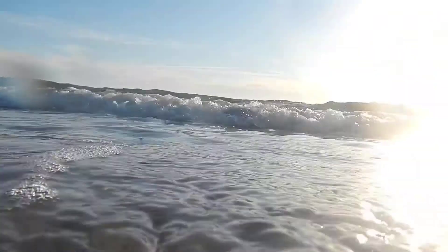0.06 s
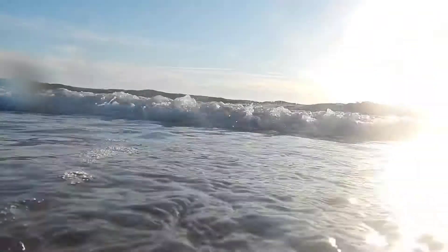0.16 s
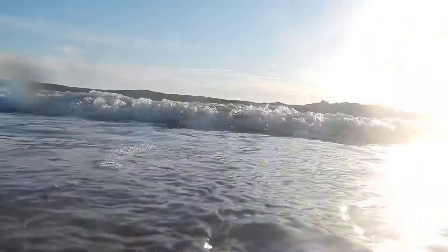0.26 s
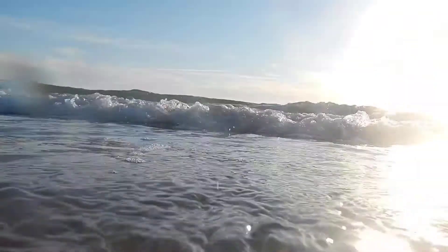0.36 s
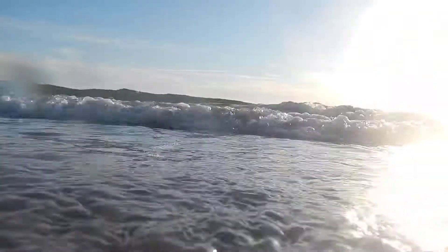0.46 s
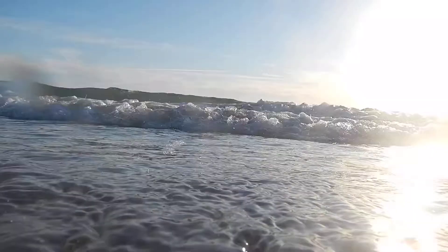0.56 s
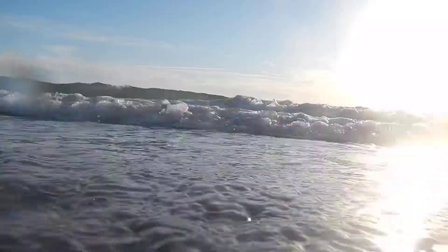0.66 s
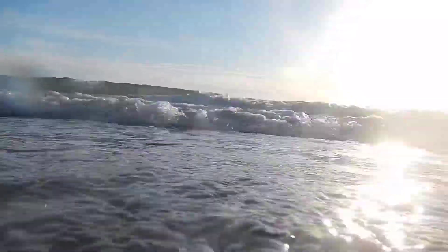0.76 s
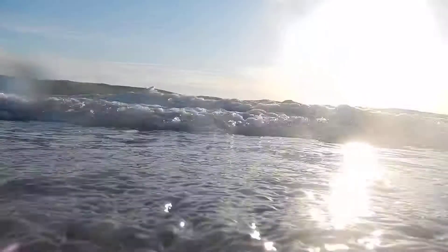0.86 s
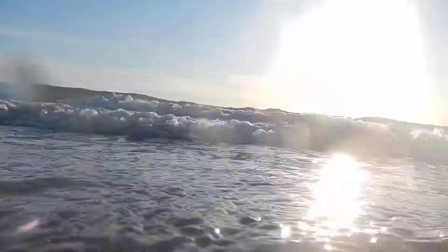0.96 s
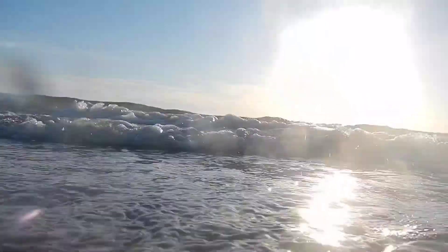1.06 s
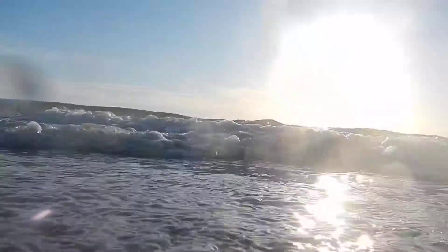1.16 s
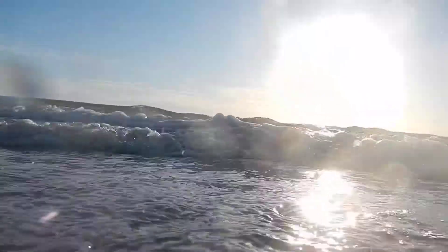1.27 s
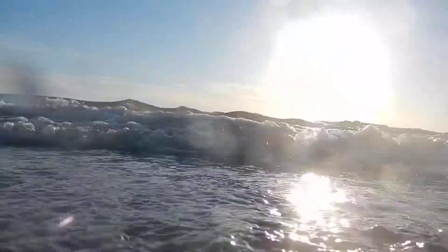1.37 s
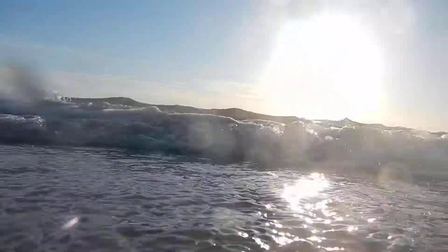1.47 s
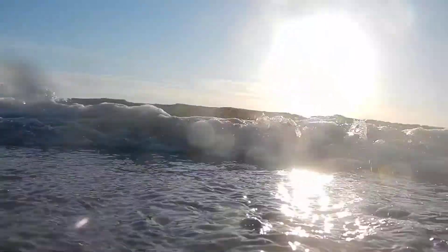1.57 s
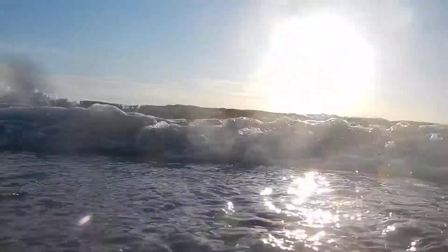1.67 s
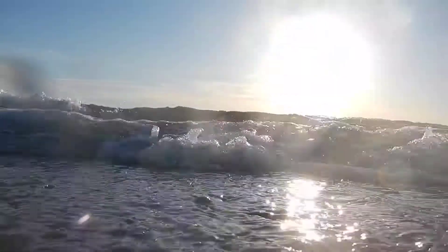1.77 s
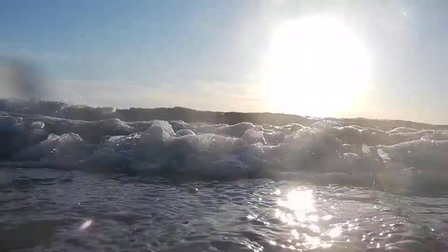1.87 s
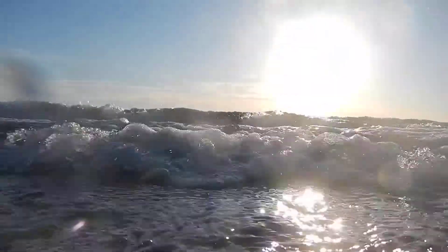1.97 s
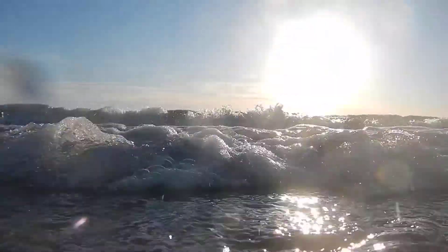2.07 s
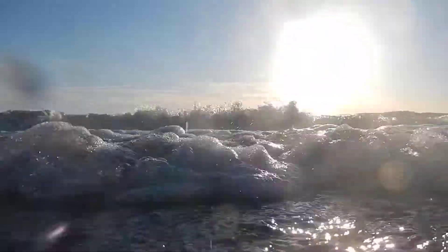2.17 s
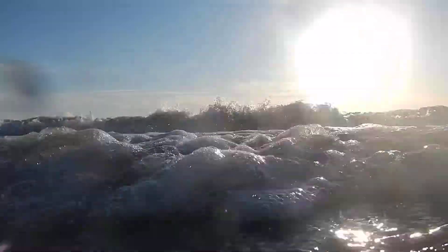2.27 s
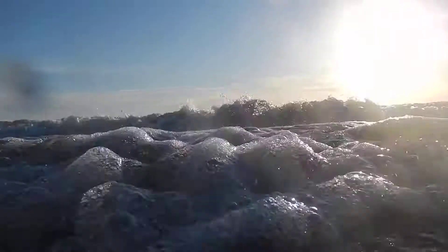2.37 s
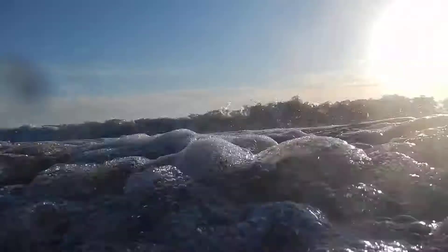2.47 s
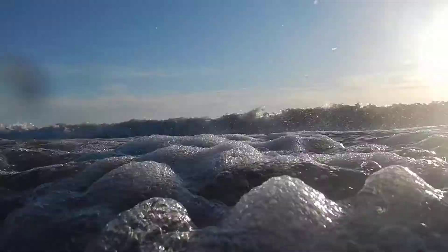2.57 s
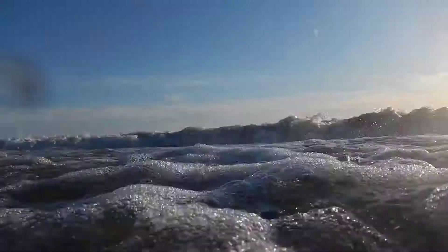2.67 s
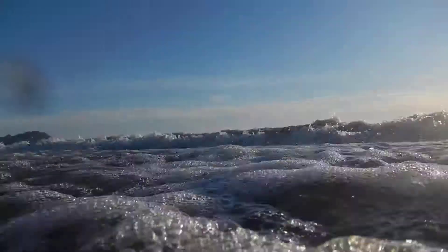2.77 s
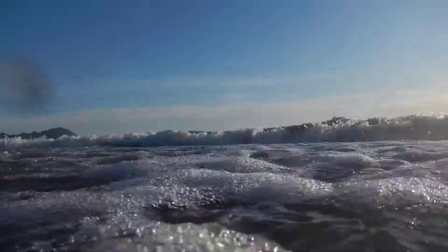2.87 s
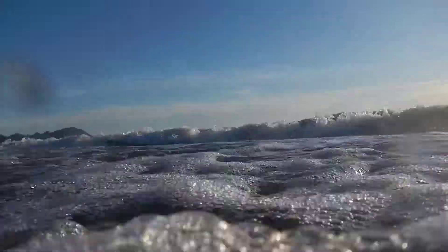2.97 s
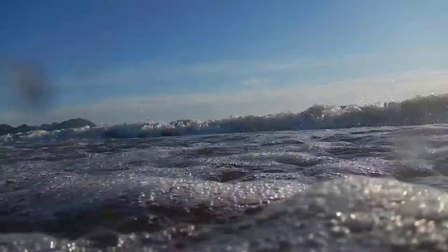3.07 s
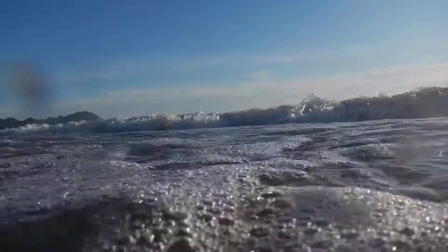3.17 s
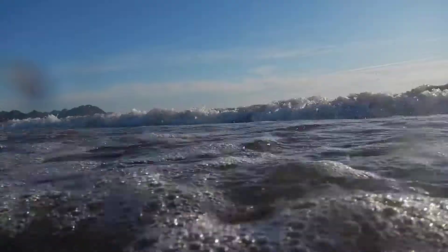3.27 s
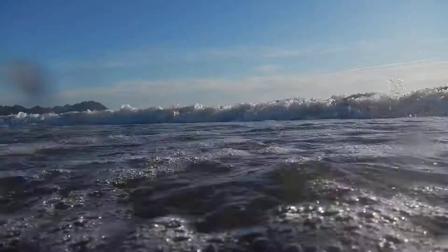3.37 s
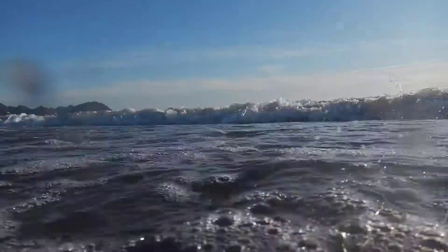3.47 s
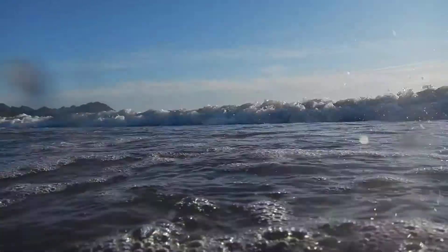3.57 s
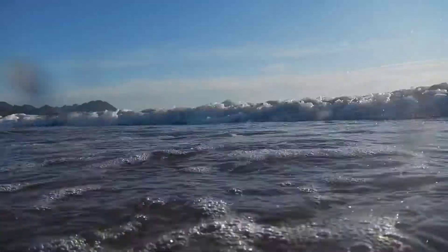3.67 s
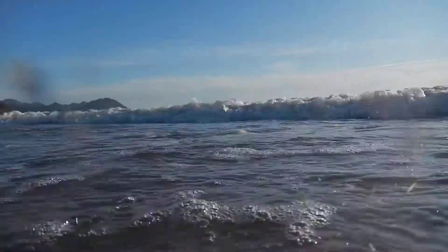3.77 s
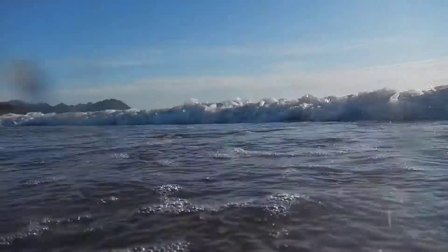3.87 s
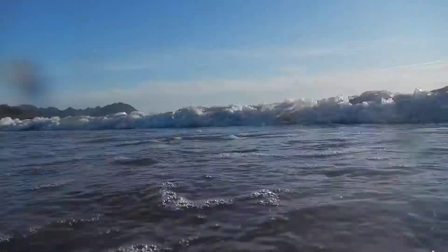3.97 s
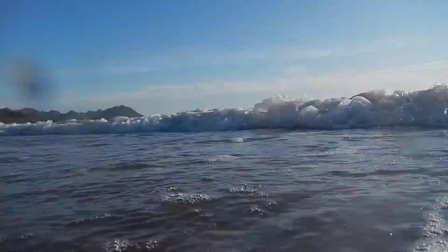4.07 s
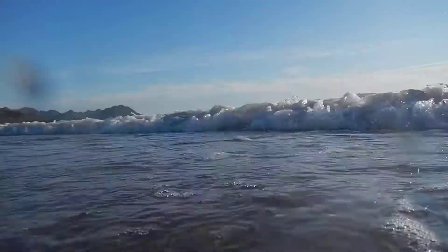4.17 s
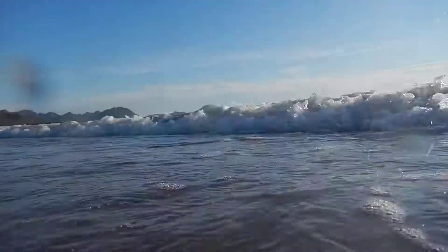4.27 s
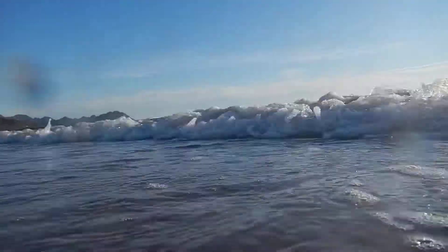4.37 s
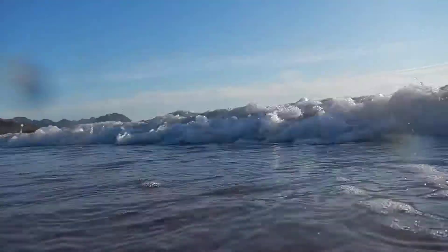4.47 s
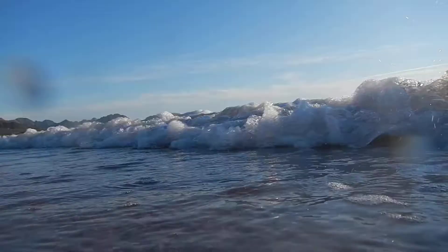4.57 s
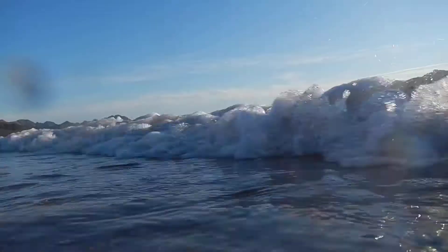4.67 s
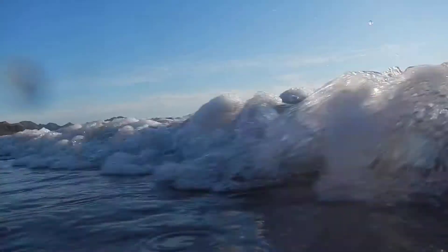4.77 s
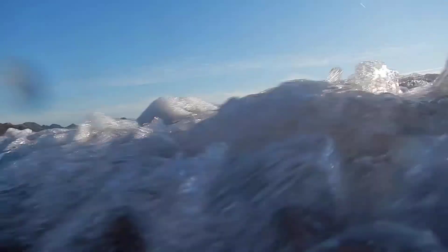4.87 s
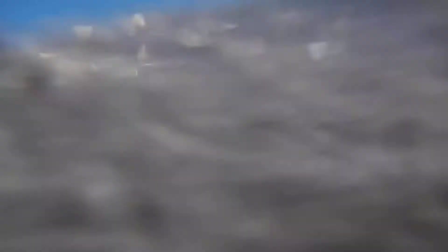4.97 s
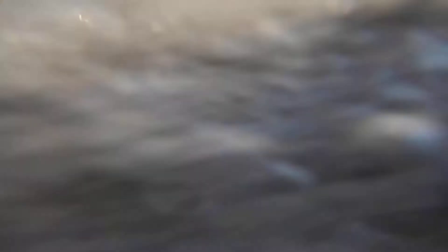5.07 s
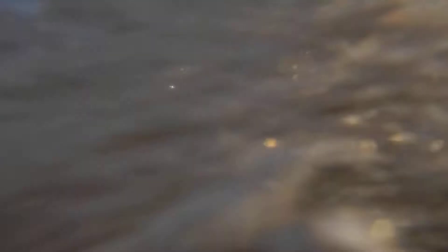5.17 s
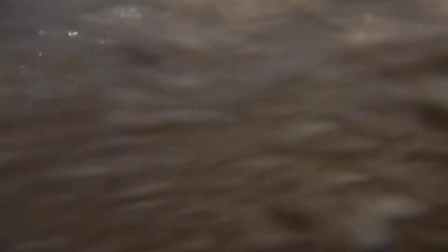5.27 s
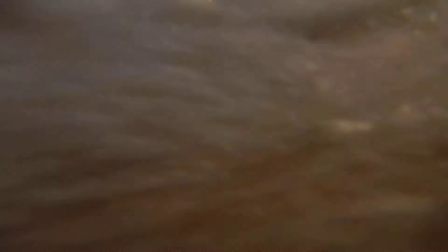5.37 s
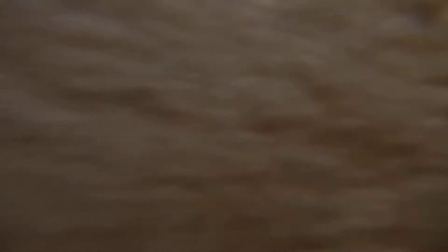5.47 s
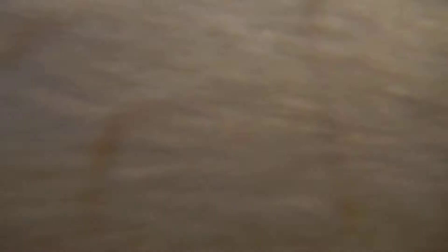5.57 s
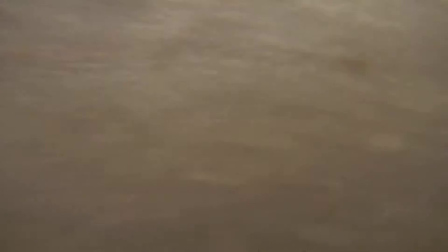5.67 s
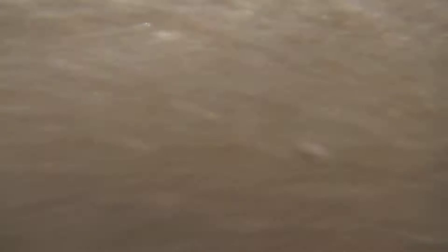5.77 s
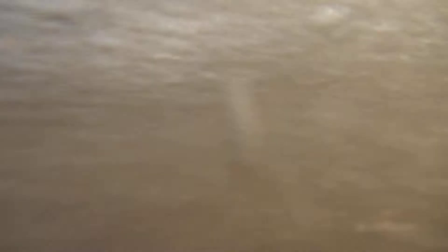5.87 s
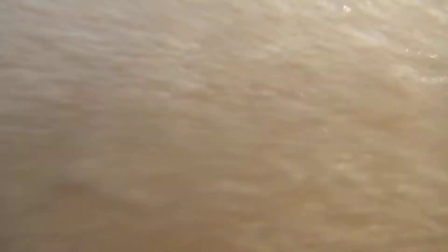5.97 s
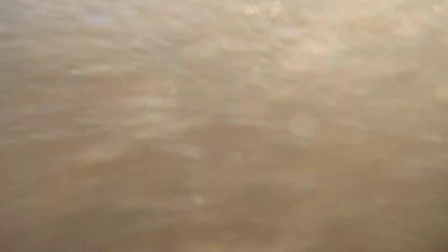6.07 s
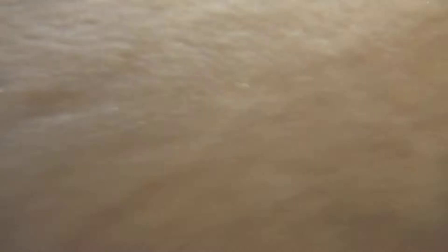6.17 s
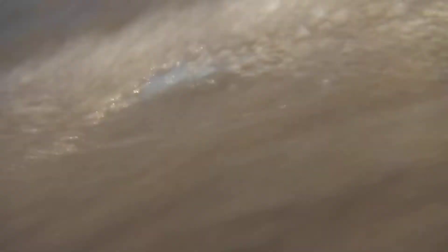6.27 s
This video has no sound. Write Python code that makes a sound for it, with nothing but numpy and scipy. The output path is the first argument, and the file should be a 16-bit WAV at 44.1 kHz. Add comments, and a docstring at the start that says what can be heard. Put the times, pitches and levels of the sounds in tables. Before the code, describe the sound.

Very close, resonant shallow surf builds, cuts back after sharp wet slaps and builds again, with bright foam hiss and clicking drops. A cluster of thuds and splashes near the middle leaves a softer wash. Just before five seconds a wave buries the microphone: loud slaps, rumbling bubbles, then duller underwater gurgling with ringing glugs to the end.

```python
"""Shallow surf roars and hisses through the two wet microphone ports of a waterproof camera at the waterline:
shaped noise, port resonances and bursting foam. Its level creeps up and drops, often just after a hard slap.
Drops ping as short gliding tones, slaps are noise bursts, wet films squeak and a very faint whine follows the roar.
A wave then buries the camera: random bubble tones and pops churn, a pocket of air hums and others glug."""
import sys
import numpy as np
from scipy import signal
from scipy.fft import rfft, irfft, next_fast_len
from scipy.io import wavfile
from scipy.ndimage import uniform_filter1d

SR = 44100
rng = np.random.default_rng(int(sys.argv[2]) if len(sys.argv) > 2 else 0)


def to_wav(s):
    """Save 16-bit WAV."""
    ch = np.atleast_2d(s).T  # columns
    pcm = np.round(np.clip(ch, -1, 1) * 32767)  # PCM
    wavfile.write(sys.argv[1], SR, pcm.astype(np.int16))


N = 279153  # samples

# level of the surf, which steps to a new level at each spell and then creeps up, before layer trims; the last
# three are relative to the roar: # start_s, roar_db, climb_db_per_s, ring_db, hiss_db, sizzle_db
SURF_SPELLS = [(0, -49, 20.5, 3.5, -17.5, -15), (1.05, -33, 17, 3, -23, -23.5),
               (1.646, -35, 24, 1, -23.5, -17), (1.998, -46.5, 17, -5.5, -22.5, -13.5),
               (2.859, -57.5, 8, -7.5, -25, -7), (3.111, -53, 16, -6, -18, -3),
               (3.916, -58, 16.5, 1, -14.5, -1.5)]
# breakers that swell as they come close: peak_s, half_length_s (to 1/e of the swell), swell_db
BREAKERS = [(1.488, 0.098, 1), (4.878, 0.15, 5.5)]
# relative spectra of the roar and of the foam hiss: frequency_hz, level_db
ROAR_SPECTRUM = [(25, -12), (100, -2.5), (180, -4.5), (270, -12.5), (390, 2), (520, 0), (700, -0.5),
                 (1200, -1.5), (1800, -15), (2300, -43), (4000, -50.5), (8000, -66)]
HISS_SPECTRUM = [(300, -30.5), (1500, 10), (2000, -0.5), (2500, 18), (3700, 16.5), (4700, -5.5),
                 (5800, 1.5), (6900, -33), (10000, -49), (16000, -56)]
# resonances of each wet port: pitch_hz, width_hz (of one filter pass), relative_level_db
LEFT_RESONANCES = [(1030, 120, -1), (1447, 270, 7), (3340, 1230, -25)]
RIGHT_RESONANCES = [(785, 210, 9.2), (962.6, 153, 16.4), (1496, 237, 0.67)]
# phase by which the right port leads the left: frequency_hz, lead_rad
PORT_PHASE = [(150, -1.5), (450, 0.56), (780, 0.35), (950, -1.33), (1250, -2.05), (1500, 0.5), (1900, 1.23),
              (2400, 4), (3000, 3.5), (3900, 1.5), (5000, 1.43), (7500, 1.5)]
# a foam front sizzling up close: time_s, centre_hz, level_db
FOAM_FRONT = [(2.0, 1550, -48), (2.1, 1694, -40), (2.25, 1830, -36), (2.42, 1704, -39), (2.6, 1650, -40.5),
              (2.72, 1503, -26.5)]
# larger drops landing on the case and ports: start_s, peak_db, pitch_hz, left_minus_right_db
DROPS = [(0.1459, -20.5, 1544, 4), (0.254, -26.5, 1440, -15), (0.659, -29.5, 2640, -13.5),
         (0.78, -30, 2700, -4), (0.803, -26, 2130, -12), (0.909, -21, 5070, 0), (0.991, -11, 1460, 5),
         (1.0434, -1.5, 1730, -11.5), (1.0808, -31, 4700, -8), (1.205, -28.5, 7850, 1),
         (1.2132, -4.5, 1400, -4), (1.223, -12.5, 4850, 1), (1.2739, -2.5, 1610, -2),
         (1.6276, -6, 1504, -7), (1.729, -27, 2520, -8), (1.792, -42, 6800, -2), (2.410, -16.5, 1545, 8),
         (2.712, -31.5, 3900, 8), (2.721, -8.5, 1315, -5), (2.7855, -8, 2670, 1), (4.913, -4, 1270, -11),
         (5.157, -25, 3420, 0), (5.267, -20.5, 2760, 2), (5.279, -8.5, 1420, -1), (6.03, -34, 4405, -2),
         (6.045, -32.5, 3520, 11), (6.1468, -28, 3300, -5), (6.1524, -23, 3010, 4.5)]
# hard slaps of water on the case, thud before its trim: start_s, thud_db, snap_db, left_minus_right_db
SLAPS = [(1.042, -26, -24, 0), (1.483, -39, -18, 1), (1.582, -23, -31.5, -14), (1.625, -16, -23, -6),
         (1.9865, -11.5, -14.5, 4), (2.545, -19, -41, -1), (2.693, -33, -29, 2), (2.7756, -6.5, -29, -7),
         (2.7861, -11, -34, -14), (2.8397, -11.5, -27.5, -10.5), (2.8762, -20, -50, -5),
         (2.891, -32, -41.5, -3), (3.283, -29.5, -67, 13), (3.9024, -6, -26, -11), (4.91, -12, -14.5, 1),
         (4.942, -4, -22, -6.5), (4.966, -4.5, -21, -3), (5.0116, -17, -22.5, -2), (5.037, -13, -21.5, 0),
         (5.086, -9.5, -31, 4), (5.184, 0.5, -10.5, 2), (5.279, -16, -25, 4), (5.463, -29, -25, 1),
         (5.641, -16, -34, -7.5), (6.07, -16, -30, 1)]
# relative spectra of the thud and of the treble snap: frequency_hz, level_db
THUD_SPECTRUM = [(25, -13), (100, -5.5), (260, -13), (390, -0.5), (700, -4), (1100, 3), (1500, -10),
                 (2100, -16), (3500, -28.5), (7000, -70.5)]
SNAP_SPECTRUM = [(800, -14.5), (2500, 18.5), (4500, 8.5), (8000, 1), (15000, -12)]
# wet films squeaking in a port: start_s, pitch_hz, first_peak_db, glide_share_of_pitch, left_minus_right_db
SQUEAKS = [(0.927, 3640, -20, -0.1, -8), (0.939, 3500, -19, -0.098, 4), (0.988, 3140, -20, 0.16, -12),
           (1.009, 3380, -20.5, 0.27, 17)]
# dull bumps of water against the housing: start_s, pitch_hz, peak_db, left_minus_right_db
BUMPS = [(2.551, 72, -28.5, 22), (3.905, 70, -33, 3), (3.974, 110.5, -37, 7), (5.458, 204, -18, -3)]
# air pockets glugging against the case: start_s, pitch_hz, peak_db, left_minus_right_db
GLUGS = [(2.794, 375, -18, -21.5), (3.003, 775, -36, 2), (3.045, 802, -34, 1), (3.283, 474, -36.5, 17),
         (5.009, 410, -10.5, 5), (5.053, 427, -15.5, 0), (5.102, 455, -13.5, 2), (5.345, 1110, -17, 0),
         (5.638, 660, -12.5, -2), (5.642, 320, -16.5, 1), (5.669, 341, -13.5, -0.5),
         (5.763, 1285, -13, -11), (5.776, 1020, -17, -5), (5.78, 358, -12.5, 0.5), (5.952, 1228, -18, -8),
         (5.9533, 503, -17.5, -18.5), (5.958, 399, -15, 10), (6.047, 1447, -17, 5.5), (6.069, 460, -5.5, 0),
         (6.0695, 725, -8, -14), (6.115, 1450, -17, 1), (6.1155, 752, -16, -16), (6.1525, 768, -14.5, -18),
         (6.153, 1340, -9.5, -1.5), (6.1775, 1443, -7, 1.5), (6.198, 990, -18.5, -1),
         (6.224, 1230, -22, -13.5), (6.303, 1397, -11, 2)]
# surges of water over the case, before layer trims:
# start_s, hold_s (counted from the start), rumble_db, spatter_db, crackle_db, left_minus_right_db
SURGES = [(2.701, 0.042, -35.5, -21, -43, -3.5), (2.764, 0.058, -28, -39, -48, -17.5),
          (2.87, 0.013, -35, -61.5, -61.5, -17.5), (2.924, 0.057, -46.5, -58, -72, -2.5),
          (2.99, 0.079, -44, -50, -74, 0), (4.89, 0.033, -31.5, -22.5, -35.5, -9.5),
          (4.925, 0.092, -17.5, -20.5, -37, -4), (5.024, 0.09, -23, -26.5, -46, 4),
          (5.17, 0.11, -23, -27, -48, 0.5), (5.335, 0.037, -23.5, -31, -50, -3),
          (5.436, 0.036, -28.5, -28.5, -38.5, -2), (5.515, 0.11, -26, -31.5, -74, 0),
          (5.703, 0.094, -29.5, -33, -58, -0.5), (5.946, 0.048, -29, -41, -64.5, 2),
          (6.024, 0.15, -31, -52, -61, -1.5), (6.247, 0.11, -31.5, -41.5, -61.5, -2.5)]
# steady churning once buried, rows for rumble, spatter, crackle, before layer trims:
# level_db (at the surface), loss_db (at full depth)
UNDERTOW = [(-26, 12), (-27.5, 20.5), (-45.5, 28)]
# depth of the ports: time_s, depth (0 at the surface to 1 well under)
DEPTH = [(5.1, 0.086), (5.6, 0.37), (5.88, 0.94), (6.33, 0.88)]
# relative spectra of big, smaller and smallest bubbles: frequency_hz, level_db
RUMBLE_SPECTRUM = [(25, -8.5), (90, 6), (170, 4), (260, -2.5), (350, -2), (440, 3.5), (620, -0.5),
                   (900, -1), (1300, -14), (2500, -58.5)]
SPATTER_SPECTRUM = [(300, -15.5), (750, -10), (1050, 0.5), (1450, 0.5), (1800, -4.5), (2200, -14.5),
                    (3200, -6.5), (5000, -50.5)]
CRACKLE_SPECTRUM = [(1000, -10), (2500, 3), (3500, -0.5), (4700, -5), (6000, -14), (9000, -18.5),
                    (15000, -43)]
# air trapped at the ports, its note sinking and then climbing: time_s, centre_hz, level_db
POCKET = [(4.95, 435.2, -27), (5.3, 398, -30), (5.65, 339.4, -42), (5.8, 365, -28), (5.9, 396.4, -39.5),
          (5.98, 503.3, -26.5), (6.06, 534, -33.5), (6.13, 762, -44), (6.3, 775, -34.5)]

DROP_S = 0.029  # time the surf takes to step to a new spell
SIZZLE_HZ, WHINE_HZ = 1724, 14836
BURIED_S, BURY_FADE_S = 4.89, 0.037  # the last wave closes over the camera
SURGE_ATTACK_S, SURGE_RELEASE_S = 0.014, 0.01
GLUG_CYCLES, BUMP_CYCLES = 29, 7.4  # cycles at the starting pitch in which a ring decays by 60 dB
CENTRED_FROM_S, CENTRED_TO_S, CENTRED_FADE_S, CENTRED_BELOW_HZ = 5.11, 5.565, 0.064, 3170
TOP_HZ = 15900


def undb(db):
    """Amplitude gain is ten to the power of decibels over twenty."""
    return 10 ** (np.asarray(db) / 20)


def unit(x):
    """Dividing by the root mean square gives unit power."""
    return x / np.sqrt(np.mean(x ** 2))


def curve(rows, axis):
    """Linear interpolation joins one column of a table in time."""
    rows = np.array(rows)
    return np.interp(np.arange(N) / SR, rows[:, 0], rows[:, axis])


def during(rows, fade):
    """A trapezoidal gate is 1 over the span of a table and fades linearly beyond its ends."""
    start, end = rows[0][0], rows[-1][0]
    return np.interp(np.arange(N) / SR, [start - fade, start, end, end + fade], [0, 1, 1, 0])


def walk(rate):
    """Random levels drawn at a given rate per second are joined by slopes, with a spread near 1."""
    hold = int(SR / rate)
    levels = np.repeat(rng.standard_normal(N // hold + 1), hold)
    return 1.2 * uniform_filter1d(levels, hold)[:N]


def colour(x, points, size=2048):
    """Minimum-phase filtering: folding the cepstrum makes a causal response with the given spectrum."""
    hz, db = np.transpose(points)
    grid_hz = np.arange(size + 1) * SR / 2 / size + 1
    log_gain = np.log(undb(np.interp(np.log(grid_hz), np.log(hz), db)))
    cepstrum = irfft(log_gain)
    cepstrum[1:size] *= 2
    cepstrum[size:] = 0
    response = irfft(np.exp(rfft(cepstrum)))[:size]
    return signal.fftconvolve(x, response[None], axes=1)[:, :x.shape[1]]


def pair(source, apart_db):
    """Partial coherence: two channels share one source and each adds an independent one."""
    shared = source()
    own = np.array([source(), source()])
    return unit(shared + undb(apart_db) * own)


def noise():
    """Countless far bubbles sum to Gaussian noise."""
    return rng.standard_normal(N)


def pops(rate, spread_db):
    """Bubbles bursting at random moments give impulses, many small and a few large."""
    size = undb(spread_db * np.minimum(rng.exponential(size=N), np.pi))
    bursts = rng.random(N) < rate / SR
    return bursts * size * rng.choice([-1, 1], N)


def panned(pan_db):
    """A level difference is split equally between left and right gains."""
    return undb(np.array([[1], [-1]]) * pan_db / 2)


def add(out, s, sound, db, pan_db):
    """Superposition places a short sound with the given peak level, before panning."""
    i = int(s * SR)
    gain = undb(db) * panned(pan_db) / np.abs(sound).max()
    out[:, i:i + sound.shape[-1]] += (gain * sound)[:, :N - i]


def bubble(hz, t60, rise, attack, size=6000):
    """A damped resonator: an air pocket rings and decays by 60 dB in t60 while its pitch glides."""
    t = np.arange(size) / SR
    pitch = hz * (1 + rise * np.minimum(t / t60, 1))
    phase = 2 * np.pi * np.cumsum(pitch) / SR
    onset = 1 - np.exp(-t / attack)
    return np.sin(phase) * onset * np.exp(-np.log(1000) * t / t60)


def burst(decay, scatter, size=3000):
    """An impact is an impulse followed by exponentially decaying noise from a scatter of tiny contacts."""
    x = scatter * rng.standard_normal((2, size)) * np.exp(-np.arange(size) / SR / decay)
    x[:, 0] += 1
    return x


def swarm(hz, db, width_hz, apart_db):
    """Amplitude modulation: low-passed noise on a carrier makes a band, as of many bubbles of one size."""
    lowpass = signal.butter(2, width_hz / 2, fs=SR, output="sos")
    band = signal.sosfilt(lowpass, pair(noise, apart_db))
    carrier = np.sin(2 * np.pi * np.cumsum(hz) / SR)
    return unit(band * carrier) * undb(db)


def gliding(rows, width_hz, apart_db):
    """A noise band follows pitch and level curves."""
    return swarm(curve(rows, axis=1), curve(rows, axis=2), width_hz, apart_db) * during(rows, 0.021)


def spell(axis):
    """A step function holds one column of the surf table until the next spell."""
    rows = np.array(SURF_SPELLS)
    return rows[np.searchsorted(rows[1:, 0], np.arange(N) / SR), axis]


def roar_level():
    """Level in dB climbs linearly within each spell, with a Gaussian swell as a breaker nears."""
    t = np.arange(N) / SR
    creep = spell(axis=1) + spell(axis=2) * (t - spell(axis=0))
    swell = sum(db * np.exp(-((t - s) / half) ** 2) for s, half, db in BREAKERS)
    return uniform_filter1d(creep, int(DROP_S * SR)) + swell


def in_air():
    """Exposure of the ports: 1 above water, falling to 0 as the wave buries them."""
    return np.clip(1 - (np.arange(N) / SR - BURIED_S) / BURY_FADE_S, 0, 1)


def ports(x):
    """Resonance: each port passes narrow bands, filtered forwards and backwards for steep flanks."""
    def ring(v, hz, width):
        return signal.filtfilt(*signal.iirpeak(hz, hz / width, fs=SR), v)
    return np.array([sum(undb(db) * ring(v, hz, width) for hz, width, db in port)
                     for v, port in zip(x, (LEFT_RESONANCES, RIGHT_RESONANCES))])


def out_of_step(x):
    """Frequency-dependent phase turns the right port against the left."""
    size = next_fast_len(N)
    lead = np.interp(np.fft.rfftfreq(size, 1 / SR), *np.transpose(PORT_PHASE))
    right = irfft(rfft(x[1], size) * np.exp(1j * lead), size)[:N]
    return np.array([x[0], right])


def roar(roar_db):
    """Broadband turbulence: breaking water is spectrally shaped noise."""
    x = colour(pair(noise, -10.5), ROAR_SPECTRUM)
    # the left port cancels a band around 850 Hz
    x[0] = signal.filtfilt(*signal.iirnotch(850, 3.8, fs=SR), x[0])
    return unit(x) * panned(-1.5) * undb(roar_db + 2.5)


def port_ring(roar_db):
    """Noise excitation makes the port resonances ring."""
    return unit(ports(pair(noise, -8))) * undb(roar_db + spell(axis=3) + 4.0)


def foam_hiss(roar_db):
    """Bursting foam sums a noise floor and random impulses."""
    foam = pair(noise, 1) + 0.77 * pair(lambda: pops(1100, 4.5), -4)
    return unit(colour(foam, HISS_SPECTRUM)) * panned(2.0) * undb(roar_db + spell(axis=4) + 4.5)


def foam_sizzle(roar_db):
    """Foam bubbles of nearly one size concentrate their sound in a band."""
    return swarm(np.full(N, SIZZLE_HZ), roar_db + spell(axis=5), 350, -5.5) * panned(9.4)


def surf():
    """Tumbling breakers modulate the roar and ring; foam adds hiss, sizzle and a moving front."""
    roar_db = roar_level()
    tumble = undb(1.0 * walk(28) + 1.13 * walk(110))
    water = tumble * (roar(roar_db) + port_ring(roar_db))
    front = gliding(FOAM_FRONT, 370, -1) * panned(-1.5)
    foam = foam_hiss(roar_db) + foam_sizzle(roar_db) + front
    return in_air() * out_of_step(water + foam)


def whine():
    """A pure tone, very faint and high, rises and falls with the roar."""
    tone = np.sin(2 * np.pi * WHINE_HZ * np.arange(N) / SR)
    return tone * undb(roar_level() - 49.0) * in_air()


def drops():
    """Damped ringing: each drop pings for a fixed number of cycles whatever its pitch, with a spit of noise."""
    out = np.zeros((2, N))
    for s, db, hz, pan_db in DROPS:
        ping = np.array([bubble(hz, 26 / hz, 0.065, 0.00021), bubble(0.965 * hz, 18 / hz, 0.28, 0.00048)])
        spectrum = [(0.35 * hz, -18), (0.29 * hz, -3), (hz, 0), (1.5 * hz, -9), (1.72 * hz, -28), (6 * hz, -46)]
        spit = colour(burst(0.0023, 0.75, size=ping.shape[1]), spectrum)
        add(out, s, ping + .4 * spit / np.abs(spit).max(), db, pan_db)
    return out


def slaps():
    """Impact: a sheet of water on the case gives a thud and a treble snap of decaying noise."""
    out = np.zeros((2, N))
    for s, thud_db, snap_db, pan_db in SLAPS:
        add(out, s, colour(burst(0.0029, 0.19), THUD_SPECTRUM), thud_db + .5, pan_db)
        add(out, s, colour(burst(0.0021, 1.0), SNAP_SPECTRUM), snap_db, pan_db)
    return out


def squeaks():
    """A quick run of damped gliding tones of nearly one pitch, each with a lower partner, makes a squeak."""
    out = np.zeros((2, N))
    for s, hz, db, glide, pan_db in SQUEAKS:
        for k, detune in enumerate(rng.standard_normal(3)):
            pitch = hz * (1 + 0.021 * detune) * (1 + glide / 4) ** k
            partner = bubble(.72 * pitch, 0.013, -0.03, 0.00046)
            chirp = bubble(pitch, 0.011, glide, 0.0011) + .5 * partner
            add(out, s + 0.0033 * k, chirp, db - 4.8 * k, pan_db)
    return out


def knocks(rows, cycles):
    """Damped resonance with an arrival delay: the right port hears each ring a little later."""
    out = np.zeros((2, N))
    for s, hz, db, pan_db in rows:
        add(out, s, bubble(hz, cycles / hz, 0.049, 0.00081), db, pan_db)
    return np.array([out[0], np.roll(out[1], SR // 6000)])


def bumps():
    """Strong damping keeps water's bumps on the housing short and dull."""
    return knocks(BUMPS, BUMP_CYCLES)


def glugs():
    """Light damping lets air that breaks loose ring for many cycles."""
    return knocks(GLUGS, GLUG_CYCLES)


def bubbling(rate, low_hz, high_hz, cycles, spread_db, size=600):
    """Granular superposition: bubbles at random moments ring for a few cycles and glide up."""
    when, pitch, length, luck = rng.random((int(rate * N / SR), 4)).T[..., None]
    turns = low_hz * (high_hz / low_hz) ** pitch * np.arange(size) / SR
    age = turns / (cycles * (.5 + length))
    tones = np.sin(2 * np.pi * turns * (1 + 0.09 * np.minimum(age, 2)))
    grains = tones * np.exp(-np.log(100) * age) * (1 - np.exp(-2 * turns))
    strength = undb(-spread_db * np.log(np.maximum(luck, .04)))
    places = (when * N).astype(int) + np.arange(size)
    return np.bincount(places.ravel(), (strength * grains).ravel(), N)[:N]


def rumble():
    """Big bubbles ring low: pops and low tones under a fluctuating level."""
    x = pair(lambda: .5 * pops(1400, 3.56) + 0.094 * bubbling(170, 327, 795, 4.5, 4.57), 0)
    return unit(colour(x, RUMBLE_SPECTRUM) * undb(2.14 * walk(55))) * undb(0.84)


def spatter():
    """Smaller bubbles ring higher, among random pops."""
    x = pair(lambda: bubbling(520, 629, 2170, 10.4, 2.8), 6.7) + .5 * pair(lambda: pops(1200, 6.3), 6)
    return unit(colour(x, SPATTER_SPECTRUM) * undb(2.0 * walk(65))) * undb(2.5)


def crackle(depth):
    """The smallest bubbles ring highest; low-pass filtering models the water muffling them with depth."""
    x = pair(lambda: bubbling(380, 2022, 6000, 42, 4.5), 6) + 1.6 * pair(lambda: pops(560, 3.6), 4.4)
    x = unit(colour(x, CRACKLE_SPECTRUM) * undb(2.8 * walk(60)))
    muffled = signal.sosfilt(signal.butter(6, 5000, fs=SR, output="sos"), x)
    return ((1 - depth) * x + depth * muffled) * undb(3.0)


def surge(s, hold):
    """A linear rise, a hold and an exponential decay shape a surge as it builds and drains."""
    t = np.arange(N) / SR - s
    return np.clip(t / SURGE_ATTACK_S, 0, 1) * np.exp(-np.clip((t - hold) / SURGE_RELEASE_S, 0, 20))


def churn():
    """Power addition: surges and steady churning set the levels of rumble, spatter and crackle."""
    depth = np.clip(curve(DEPTH, axis=1), 0, 1)
    layers = (rumble(), spatter(), crackle(depth))
    starts, holds, *levels, sides = np.transpose(SURGES)
    power_shapes = np.array([surge(s, hold) for s, hold in zip(starts, holds)]) ** 2
    out = 0
    for layer, surge_db, (top_db, loss_db) in zip(layers, levels, UNDERTOW):
        steady = (1 - in_air()) * undb(top_db - loss_db * depth)
        surge_power = (panned(sides) * undb(surge_db)) ** 2 @ power_shapes
        out = out + layer * np.sqrt(steady ** 2 + surge_power)
    return out


def pocket():
    """Cavity resonance: air trapped at the ports hums in a narrow band with a moving pitch."""
    return gliding(POCKET, 70, -1)


def scene():
    """Linear superposition sums the sounds from above and below the surface at the ports."""
    above = surf() + whine() + drops() + slaps() + squeaks()
    below = bumps() + churn() + glugs() + pocket()
    return above + below


def narrow(x):
    """Removing the side signal below the treble centres the image for about half a second under water."""
    side = (x[0] - x[1]) / 2
    lowpass = signal.butter(12, CENTRED_BELOW_HZ, fs=SR, output="sos")
    gate = during([(CENTRED_FROM_S,), (CENTRED_TO_S,)], CENTRED_FADE_S)
    low = signal.sosfiltfilt(lowpass, side) * gate
    return np.array([x[0] - low, x[1] + low])


def record(dry):
    """Soft saturation rounds peaks below full scale; the image narrows briefly and a low-pass cuts the top."""
    rounded = .94 * np.tanh(dry / .94)
    lowpass = signal.ellip(8, .2, 80, TOP_HZ, fs=SR, output="sos")
    return signal.sosfilt(lowpass, narrow(rounded))


dry = scene()
out = record(dry)
to_wav(out)
```